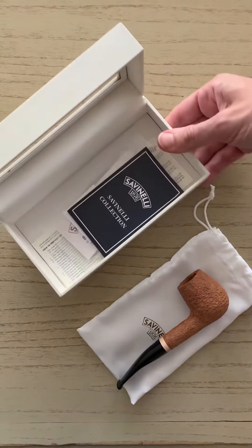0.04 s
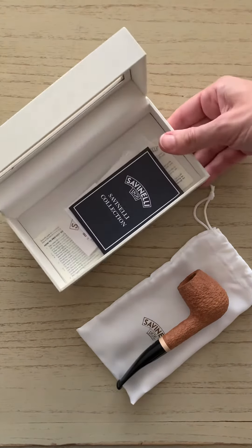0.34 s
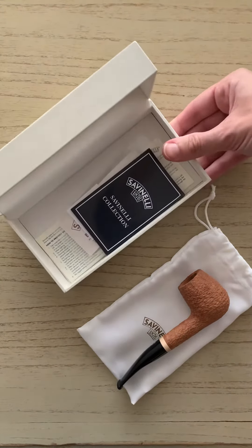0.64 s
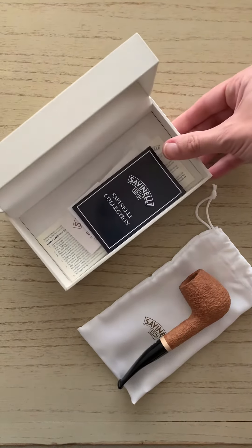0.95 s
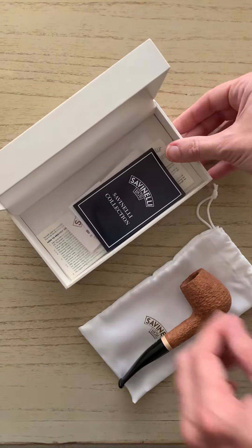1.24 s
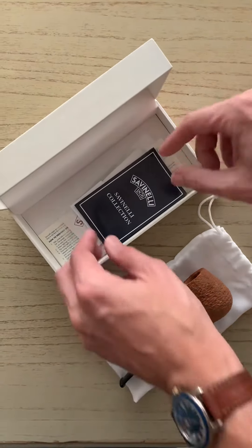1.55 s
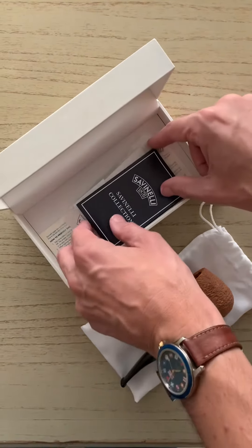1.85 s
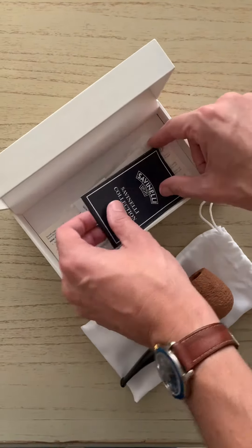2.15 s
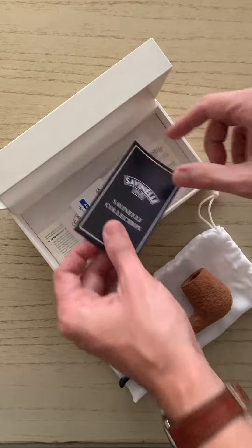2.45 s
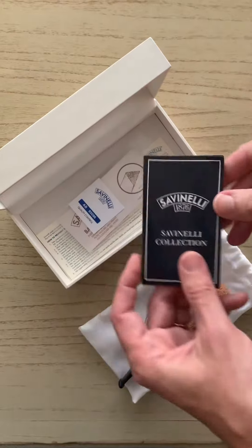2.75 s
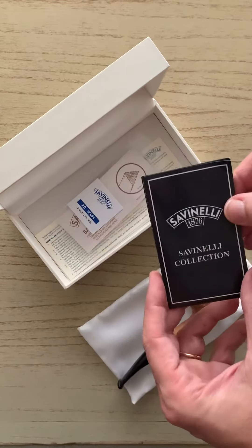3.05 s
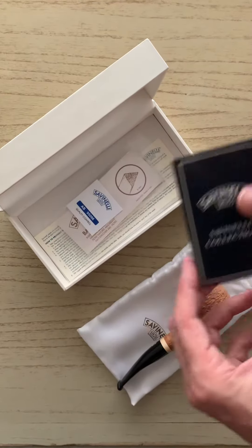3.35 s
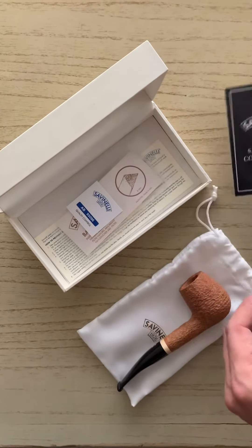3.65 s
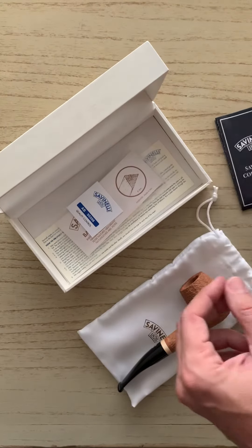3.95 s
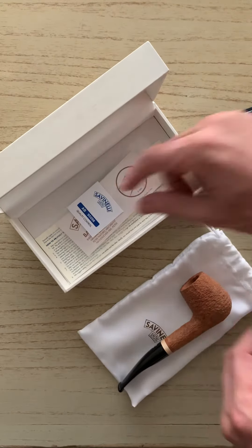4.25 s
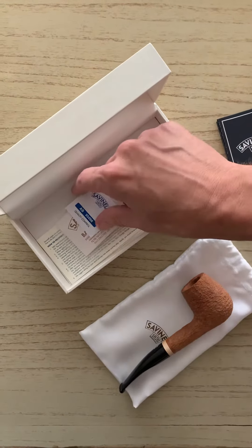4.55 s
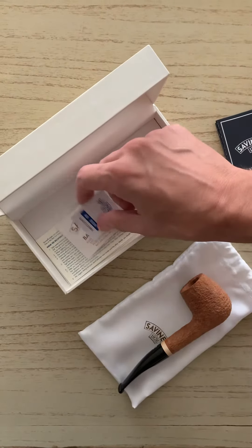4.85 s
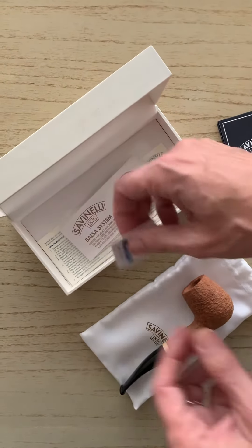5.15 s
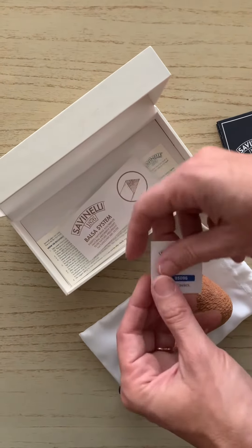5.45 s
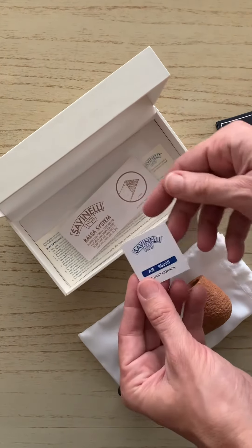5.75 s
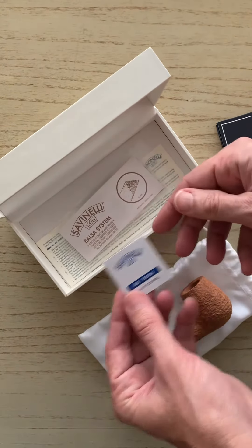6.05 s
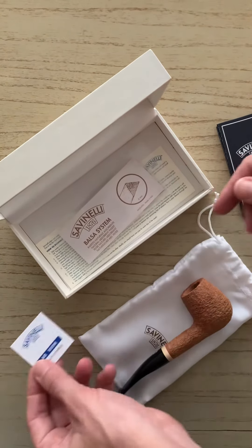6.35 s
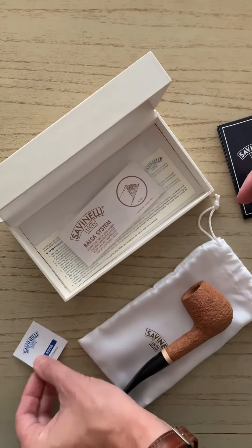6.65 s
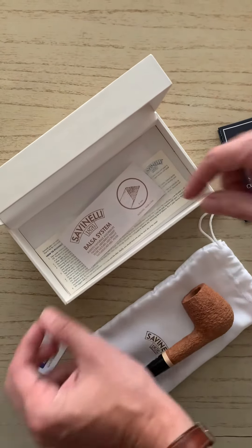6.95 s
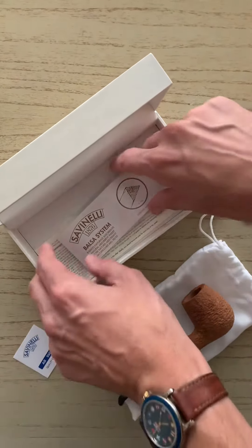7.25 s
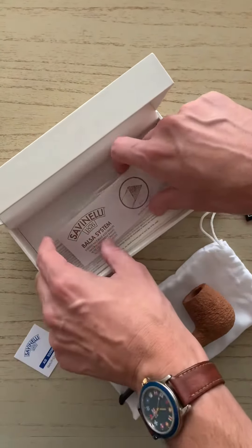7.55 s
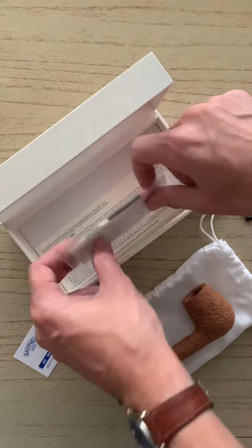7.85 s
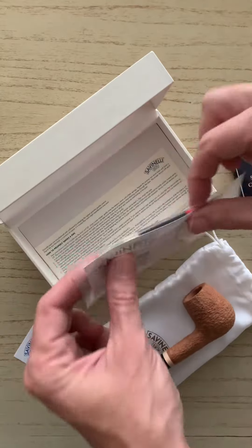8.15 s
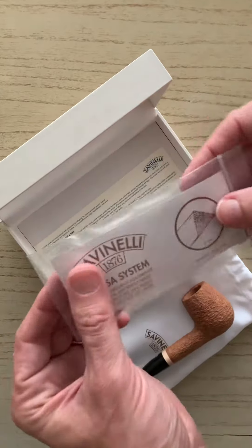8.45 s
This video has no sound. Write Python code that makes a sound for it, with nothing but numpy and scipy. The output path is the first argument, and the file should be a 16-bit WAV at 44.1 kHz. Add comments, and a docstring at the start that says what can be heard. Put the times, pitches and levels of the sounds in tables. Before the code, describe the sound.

The lid of a stiff cardboard box knocks several times on a wooden table, the last knock loudest, with a short hollow ring. Hands then softly slide out a booklet and a small card, each set down with a tap or snap. Finally a thin plastic sleeve rubs and crinkles with small clicks. Everything is close, in a small room with a low hum and a dull wash of air.

```python
"""Unpacking a cardboard box

The lid of a stiff box tips back and knocks on a wooden table close by, making the box ring.
Hands lift out a booklet, a small card and a plastic sleeve: surfaces slide in countless tiny slips,
and edges tap and snap. The small room holds a low hum and a dull, steady wash of air."""
import sys
import numpy as np
from scipy import signal
from scipy.fft import rfft, irfft, next_fast_len
from scipy.io import wavfile
from scipy.ndimage import uniform_filter1d

SR = 44100
rng = np.random.default_rng(int(sys.argv[2]) if len(sys.argv) > 2 else 0)


def output_pcm(signal):
    """Save a mono or channel-first signal as 16-bit PCM at the path in sys.argv[1].

    Samples are clipped to [-1, 1] before scaling.
    """
    pcm = np.clip(np.atleast_2d(signal).T, -1, 1) * 32767
    wavfile.write(sys.argv[1], SR, np.round(pcm).astype(np.int16))


N = 379701
TIME = np.arange(N) / SR

# The tone of the room's air. Each row: frequency in Hz, relative level in dB.
AIR_TONE = [(20, -23), (45, 2), (100, 1.5), (170, -1.5), (270, -3.5), (340, -9), (600, -11.5), (1300, -14),
            (2200, -20.5), (4000, -36.5), (6000, -48), (10000, -52), (16000, -56)]
# The air slowly grows a little louder. Each row: time in seconds, level in dB.
AIR_LEVEL = [(0, -44.5), (1.5, -44), (4.0, -42.5), (6.5, -42), (8.61, -40.5)]
# Low notes that the room boosts. Each row: pitch in Hz, width in Hz, boost in dB.
ROOM_NOTES = [(89.8, 5.3, 9.2), (97.6, 8.7, 7.8), (134.66, 6.7, 15.34), (218.7, 6.5, 5.8), (263.3, 18, 5.3),
              (545, 43, 5.3)]
# The hum starts quiet and swells later. Each row: time in seconds, relative level in dB.
HUM_LEVEL = [(0, -57), (1.6, -51.5), (2.05, -41.5), (2.4, -54), (3.5, -46), (3.82, -35), (3.98, -55),
             (4.22, -37.5), (4.52, -46.5), (4.87, -36), (5.35, -49.5), (6.2, -44), (6.8, -41.5),
             (7.4, -48.5), (7.62, -34), (8.15, -40.5), (8.31, -33.5), (8.5, -44)]
# Faint low tones. Each row: middle and length in seconds, top pitch in Hz, level in dB.
LOW_TONES = [(2.855, 0.54, 239, -56), (5.03, 0.39, 263.4, -53.5), (6.777, 0.44, 211.3, -55),
             (7.732, 0.774, 266.3, -46), (8.126, 0.43, 206.3, -46.5)]
# How long the room echoes. Each row: frequency in Hz, seconds to fade by 60 dB.
ROOM_FADE = [(100, 0.37), (260, 0.94), (700, 0.49), (1800, 0.42), (5000, 0.35), (14000, 0.14)]
# Echoes off the table and the box walls. Each row: delay in milliseconds, relative level in dB.
NEAR_ECHOES = [(.8, -17.5), (1.9, -18), (3.1, -11), (7.9, -13.5)]
# Paper and card sliding on each other and under the fingers. Each row: fastest moment in seconds,
# relative level in dB, rise and fall in seconds, brightness in dB.
PAPER_STROKES = [(0.495, -68, .008, 0.19, -11), (1.722, -69, .05, 0.045, -6), (2.28, -65.5, 0.088, .05, -2),
                 (2.53, -74.5, .2, 0.17, 0), (2.64, -75, 0.037, .22, -3), (2.844, -62.5, .13, 0.028, -3.5),
                 (3.198, -53, 0.034, 0.046, 10), (3.248, -65, .04, .13, -1), (3.54, -77, .06, .06, -10),
                 (3.705, -63.5, 0.04, .15, -7), (3.8, -57.5, .08, .02, -5), (4.42, -66.5, 0.024, 0.14, -3),
                 (4.802, -56, 0.028, 0.088, 0), (4.877, -65, .03, 0.032, 5), (5.21, -58, 0.08, .05, 3),
                 (5.33, -61, 0.017, 0.048, 1), (5.515, -64, 0.1, 0.096, 3), (6.603, -54, 0.065, 0.065, -8)]
# The tone of sliding paper. Each row: frequency in Hz, relative level in dB.
PAPER_TONE = [(400, -14), (1500, -10), (3200, 5.5), (5200, 3.5), (6800, 5.5), (9000, -1), (12000, 3),
              (14500, -2), (16000, -5)]
# The plastic sleeve rubbing out of the box. Each row reads as in PAPER_STROKES.
SLEEVE_STROKES = [(7.172, -60.5, 0.02, 0.032, -3), (7.246, -61, .04, 0.075, 3),
                  (7.415, -65, 0.14, 0.092, 1), (7.55, -67.5, .03, 0.22, -5), (7.69, -64.5, 0.29, 0.12, 1),
                  (7.835, -50, 0.098, 0.087, 0), (8.06, -57, 0.15, .27, -2), (8.28, -63.5, .06, .35, -5),
                  (8.49, -59.5, 0.36, 0.18, -1.5)]
# The tone of thin plastic. Each row: frequency in Hz, relative level in dB.
SLEEVE_TONE = [(400, -4), (1500, 5), (3200, 2), (6000, -7.5), (9000, -12.5), (12000, -16.5), (16000, -27)]
# Taps of card and plastic. Each row: time in seconds, snap level in dB, its fade in milliseconds,
# its tilt towards treble in dB per octave, level in dB and centre in Hz of the thock under it.
TAPS = [(1.7270, -49.5, 0.92, 5, -39.5, 1430), (3.6820, -37.5, 0.96, 0, -31, 1710),
        (3.8087, -26.5, 2.5, -6.5, -21.5, 1470), (4.418, -56, 1.5, 1, -43, 2000),
        (5.087, -47, 1.5, 4, -66, 2000), (6.599, -41, 1, -3, -63, 1500),
        (6.626, -24.5, 1.7, 7, -38.5, 1200), (6.6283, -25.5, 2.5, 0.5, -35, 1200),
        (7.428, -49, 3.6, -9, -33.5, 2630), (7.544, -58, 1.5, -14, -42, 2500),
        (7.688, -46, 2.6, -9, -43, 2000), (7.7000, -47, 1.4, -6, -60, 2000),
        (7.7320, -39, 1.3, 3, -54, 2000), (7.7700, -47, 1.0, -2, -58, 2000),
        (7.84, -45, 1.5, 7, -36.5, 1900), (7.875, -40.5, 1.3, -3, -47, 2000),
        (7.8900, -41, 1.5, -8.5, -60, 2000), (8.0385, -38, 3.3, 10.5, -61, 2000),
        (8.088, -43.5, 1, -4, -62, 2000), (8.1665, -41.5, 1.4, -10.5, -44, 2800),
        (8.389, -33, 2.9, -1, -55, 3000), (8.5820, -46.5, 1.3, -4, -70, 2040)]
# The tone of a snap before its tilt. Each row: frequency in Hz, relative level in dB.
SNAP_TONE = [(500, -25), (1500, -1.5), (3000, -6), (4000, 2.5), (5000, -1.5), (7000, 1), (8500, -6),
             (10500, -2), (13000, -16), (16000, -8)]
# The notes of the box on the table. Each row: pitch in Hz, relative level in dB,
# seconds to fade by 60 dB before a knock's damping shortens that.
BOX_NOTES = [(92.3, -25, 0.95), (136.8, -16, 0.74), (195, -14.5, 0.69), (230.3, -17.5, 0.56),
             (260.3, 0.5, 0.22), (341.5, -16, 0.1), (393, -11.5, 0.11), (533, -33.5, 0.6),
             (742, -22.5, 0.23), (920, -33, 0.11), (985, -18, 0.12), (1185, -23, 0.053),
             (1343, -19.5, 0.096), (1520, -25, 0.11), (1687, -43, 0.28), (1786, -33, 0.18),
             (2163, -28, 0.066), (2270, -52.5, 0.27), (3230, -37.5, 0.033)]
# The lid's knocks. Each row: start in seconds, crack level in dB, its centre in Hz, its bass and
# treble slopes in dB per octave, share sent to the room in dB, ring level in dB,
# ring tilt in dB per octave, damping (how many times faster the ring fades).
LID_KNOCKS = [(0.1942, -36, 650, 9, 20, 0, -20.5, -3, 2.5),
              (0.3175, -18.5, 1140, 4.8, 22.7, -8, -10, 0, 2.15),
              (0.4896, -12.5, 1970, 14, 43, -12.5, -13.5, 3.5, 3),
              (0.5140, -21.5, 1000, 3.7, 42, -3.5, -10, -0.5, 2.14),
              (0.9832, -1, 1176, 15, 15.7, -6.5, -5, 3, 1.33),
              (0.9914, -18, 1250, 28, 43, -10, -16.5, -0.076, 1.2)]
# How alike sound from all sides is at the two microphones. Each row: frequency in Hz, likeness 0 to 1.
MIC_LIKENESS = [(100, 1), (280, 0.98), (600, 0.33), (1300, 0.54), (2400, 0.5), (4500, 1), (15000, .95)]
# How far the left microphone's wave runs ahead. Each row: frequency in Hz, phase in radians.
LEFT_LEAD = [(0, 0), (900, -.45), (1500, 0), (2400, 1.6), (3700, 1.7), (4650, 3.2), (6500, 6.2),
             (7300, 6.35), (8950, 9.45), (10600, 12.45), (11500, 12.65), (13100, 15.7), (14700, 18.8)]
# The balance of the microphones. Each row: frequency in Hz, left minus right in dB.
MIC_BALANCE = [(60, 0.48), (250, 1.6), (600, 2.6), (1200, -2.0), (3000, 0.31)]


def gain(db):
    """Turns decibels into a number to multiply by."""
    return 10 ** (np.asarray(db) / 20)


def unit_power(x):
    """Scales a signal to an average power of one."""
    return x / np.sqrt(np.mean(x ** 2) + 1e-20)


def look_up(table, hz):
    """Reads between a table's rows, spacing frequencies by octaves."""
    row_hz, value = np.transpose(table)
    return np.interp(np.log(hz + 1), np.log(row_hz + 1), value)


def filtered(x, response):
    """Multiplies each frequency in a sound by response(hz)."""
    size = next_fast_len(x.shape[-1] + 4096)
    hz = np.fft.rfftfreq(size, 1 / SR)
    return irfft(rfft(x, size) * response(hz), size)[..., :x.shape[-1]]


def add(mix, start_s, sound):
    """Mixes a sound in at a given time."""
    part = mix[max(round(start_s * SR), 0):][:len(sound)]
    part += sound[:len(part)]


def random_hills(shape, widths):
    """Smooth random hills and hollows, about one unit in size."""
    field = rng.standard_normal(shape)
    for axis, width in enumerate(widths):
        field = uniform_filter1d(field, width, axis)
    return unit_power(field)


def from_all_sides(pair):
    """Blends two unrelated noises into a left and a right that are partly alike."""
    def angle(hz):
        return np.arccos(np.clip(look_up(MIC_LIKENESS, hz), 0, 1)) / 2
    mid = filtered(pair[0], lambda hz: np.cos(angle(hz)))
    side = filtered(pair[1], lambda hz: np.sin(angle(hz)))
    return np.array([mid + side, mid - side])


def room_air(ripple_db=1.9):
    """A dull wash, boosted at the room's low notes and rippled by its crowded higher ones."""
    grid_hz = np.linspace(0, SR / 2, 2400)
    ripple = ripple_db * random_hills(grid_hz.shape, [2]) * np.clip(grid_hz / 300 - 1, 0, 1)
    def tone(hz):
        boost = sum((gain(db) - 1) ** 2 / (1 + (2 * (hz - note_hz) / width) ** 2) ** 2
                    for note_hz, width, db in ROOM_NOTES)
        return gain(look_up(AIR_TONE, hz) + np.interp(hz, grid_hz, ripple)) * (1 + np.sqrt(boost))
    wash = from_all_sides(filtered(rng.standard_normal((2, N)), tone))
    return unit_power(wash) * gain(np.interp(TIME, *np.transpose(AIR_LEVEL)))


def hum(pitch_hz=65, waver_hz=2.207, waver_rate_hz=6, trim_db=-1, rumble_db=-51, rumble_width_hz=9):
    """A low hum wavers and swells; a rumble at the same pitch throbs against it."""
    def noise_band(centre, width):
        return unit_power(filtered(rng.standard_normal(N), lambda hz: np.exp(-((hz - centre) / width) ** 2)))
    waver = noise_band(0, waver_rate_hz)
    rumble = noise_band(pitch_hz, rumble_width_hz)
    cycles = np.cumsum(pitch_hz + waver_hz * waver) / SR
    loudness = gain(trim_db + np.interp(TIME, *np.transpose(HUM_LEVEL)))
    return np.sqrt(2) * loudness * np.sin(2 * np.pi * cycles) + gain(rumble_db) * rumble


def low_tones(pitch_sag=.04):
    """Faint tones swell and fade, a little flat as they come and go."""
    out = np.zeros(N)
    for middle_s, length_s, hz, db in LOW_TONES:
        arch = np.clip(1 - (2 * (TIME - middle_s) / length_s) ** 2, 0, 1)
        cycles = np.cumsum(hz * (1 - pitch_sag * (1 - arch))) / SR
        out += np.sqrt(2) * gain(db) * arch * np.sin(2 * np.pi * cycles)
    return out


def room_echo(x, first_echo_s=0.0037):
    """A small room's many echoes blur into a tail; the treble dies first."""
    hz, t, spectrum = signal.stft(rng.standard_normal((2, SR)), SR, nperseg=256)
    spectrum *= gain(-60 * t / look_up(ROOM_FADE, hz)[:, None])
    tail = from_all_sides(signal.istft(spectrum, SR, nperseg=256)[1])
    tail *= np.clip(np.arange(tail.shape[1]) / SR / first_echo_s - 1, 0, 1)
    return signal.fftconvolve(x[None], tail / np.linalg.norm(tail[0]), axes=1)[:, :N]


def with_near_echoes(x, echo_db):
    """Adds the first echoes off the surfaces right beside the hands."""
    return filtered(x, lambda hz: 1 + sum(gain(echo_db + db) * np.exp(-2j * np.pi * hz * ms / 1000)
                                          for ms, db in NEAR_ECHOES))


def stroke_loudness(strokes, drop_db=21.5):
    """Each stroke speeds up, then dies away: drop_db quieter one rise or fall time from its peak."""
    curves = []
    for peak_s, db, rise_s, fall_s, _ in strokes:
        from_peak = np.maximum((peak_s - TIME) / rise_s, (TIME - peak_s) / fall_s)
        curves.append(gain(db - drop_db * np.minimum(from_peak, 10)))
    return np.array(curves)


def sliding(strokes, tone, level_db, grain_db, slips_per_s, neutral_db, tilt_share, flicker_db=5):
    """Rubbing is countless tiny slips of uneven size; a brighter stroke has more treble."""
    sizes = gain(grain_db * np.minimum(rng.exponential(1, N), 5))
    slipping = rng.random(N) < slips_per_s / SR
    slips = sizes * slipping * rng.standard_normal(N)
    hiss = unit_power(filtered(slips, lambda hz: gain(look_up(tone, hz))))
    power = stroke_loudness(strokes) ** 2
    bright_db = np.array(strokes)[:, -1] @ power / power.sum(0)  # the loudest stroke counts most
    hz, t, spectrum = signal.stft(hiss * np.sqrt(power.sum(0)), SR, nperseg=256)
    tilt_db = tilt_share * np.clip(np.interp(t, TIME, bright_db) - neutral_db, -9, 5)
    spectrum *= gain(np.log2(np.maximum(hz, 2500) / 6800)[:, None] * tilt_db)
    spectrum *= gain(flicker_db * random_hills(spectrum.shape, [5, 12]))  # bending shifts the tone
    return gain(level_db) * signal.istft(spectrum, SR, nperseg=256)[1][:N]


def crinkles(per_s=69, size_db=3.5, level_db=-7, fade_ms=0.84):
    """Creases in the sleeve flick over at random, louder when it is rubbed harder."""
    sizes = gain(size_db * np.minimum(rng.exponential(1, N), 3))
    flicks = sizes * (rng.random(N) < per_s / SR)
    fades = signal.lfilter([1], [1, -np.exp(-1000 / fade_ms / SR)], flicks)
    crackle = filtered(fades * rng.standard_normal(N), lambda hz: gain(look_up(SLEEVE_TONE, hz)))
    return gain(level_db) * unit_power(crackle) * np.linalg.norm(stroke_loudness(SLEEVE_STROKES), axis=0)


def snaps(pivot_hz=7000, scrape_ms=0.81):
    """An edge of card or plastic scrapes briefly, then lets go in a tiny burst of noise."""
    out, t = np.zeros(N), np.arange(-256, 1024) / SR
    for time_s, db, fade_ms, tilt_db, *_ in TAPS:
        def tone(hz):
            return gain(look_up(SNAP_TONE, hz) + tilt_db * np.log2((hz + 300) / pivot_hz))
        loudness = np.exp(-abs(t) * 1000 / np.where(t < 0, scrape_ms, fade_ms))
        burst = filtered(loudness * rng.standard_normal(len(t)), tone)
        burst *= np.linalg.norm(loudness) / np.linalg.norm(burst)
        add(out, time_s + t[0], gain(db) * burst)
    return out


def board_hit(centre_hz, bass_slope, treble_slope, travel_ms_at_1khz=1.917):
    """An edge strikes a board and bends it; the treble travels through the board fastest."""
    hz = np.fft.rfftfreq(4096, 1 / SR)
    octaves = np.log2((hz + 1) / centre_hz)
    hump = 1 / np.hypot(gain(-bass_slope * octaves), gain(treble_slope * octaves))
    travel = np.exp(-4j * np.pi * travel_ms_at_1khz * np.sqrt(hz / 1000))
    pulse = irfft(hump * travel)
    return pulse / abs(pulse).max() * np.linspace(1, 0, len(pulse)) ** 2


def thocks():
    """The table or the floor of the box answers each tap."""
    out = np.zeros(N)
    for time_s, *_, db, hz in TAPS:
        add(out, time_s - .0005, gain(db) * board_hit(hz, bass_slope=1.5, treble_slope=15))
    return out


def box_ring(build_cycles=0.68, lag_cycles=0.94):
    """Each knock sets the box ringing, low notes last; the ring is short while the lid still moves."""
    out, t = np.zeros(N), np.arange(SR) / SR
    loudest_hz = max(BOX_NOTES, key=lambda note: note[1])[0]
    for start_s, *_, ring_db, tilt_db, damping in LID_KNOCKS:
        for hz, db, fade_s in BOX_NOTES:
            level = gain(ring_db + db + tilt_db * np.log2(hz / loudest_hz))
            build = 1 - np.exp(-hz * t / build_cycles)
            fade = gain(-60 * t * damping / fade_s)
            add(out, start_s + lag_cycles / hz, level * build * fade * np.sin(2 * np.pi * hz * t))
    return out


def lid_cracks():
    """The lid's edge hits the table: gives the near sound and the share that spreads into the room."""
    near, spread = np.zeros((2, N))
    for start_s, db, centre_hz, bass_slope, treble_slope, room_db, *_ in LID_KNOCKS:
        pulse = gain(db) * board_hit(centre_hz, bass_slope, treble_slope)
        add(near, start_s, pulse)
        add(spread, start_s, gain(room_db) * pulse)
    return np.array([near, spread])


def scene():
    """Mixes near sounds, echoes and background; knocks send more into the room than paper does."""
    cracks, spread = with_near_echoes(lid_cracks(), echo_db=-3.5)
    ring = box_ring()
    ticks = with_near_echoes(snaps(), echo_db=-29)
    boards = with_near_echoes(thocks(), echo_db=2)
    paper = sliding(PAPER_STROKES, PAPER_TONE, level_db=-0.5, grain_db=2,
                    slips_per_s=13000, neutral_db=0, tilt_share=0.99)
    sleeve = sliding(SLEEVE_STROKES, SLEEVE_TONE, level_db=3.5, grain_db=-1.5,
                     slips_per_s=8000, neutral_db=-5, tilt_share=1)
    rubbing = with_near_echoes(paper + sleeve + crinkles(), echo_db=3)
    near = cracks + ring + ticks + boards + rubbing
    into_room = spread + gain(-15) * ring + gain(-12) * ticks + gain(-7) * boards + gain(-25) * rubbing
    return near + room_echo(into_room) + hum() + low_tones() + room_air()


def record(dry, top_hz=15900):
    """Two microphones hear slightly different timing and level; the highest treble is cut off."""
    def microphones(hz):
        lead = np.interp(hz, *np.transpose(LEFT_LEAD))
        left = gain(look_up(MIC_BALANCE, hz) / 2) * np.exp(.5j * lead)
        return np.array([left, 1 / left])
    treble_cut = signal.firwin(255, top_hz, window=("kaiser", 9), fs=SR)
    return signal.oaconvolve(filtered(dry, microphones), treble_cut[None], "same", axes=1)


dry = scene()
out = record(dry)
output_pcm(out)
```